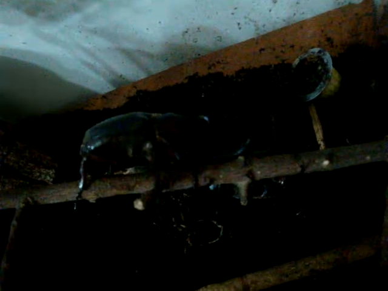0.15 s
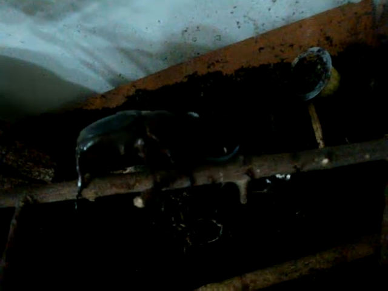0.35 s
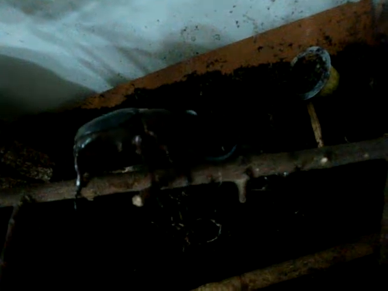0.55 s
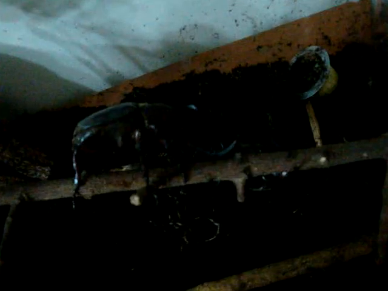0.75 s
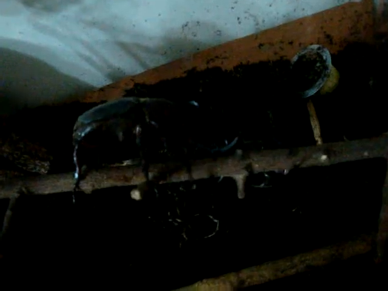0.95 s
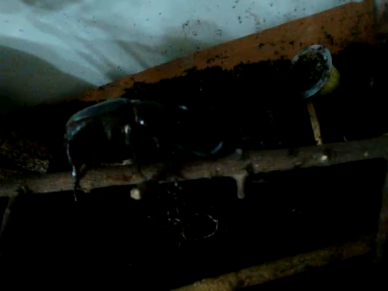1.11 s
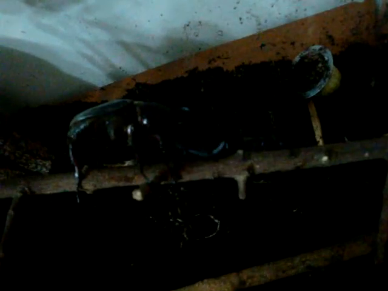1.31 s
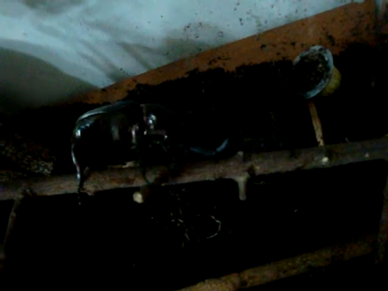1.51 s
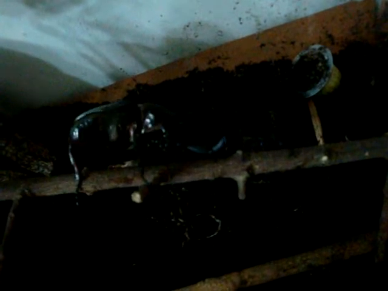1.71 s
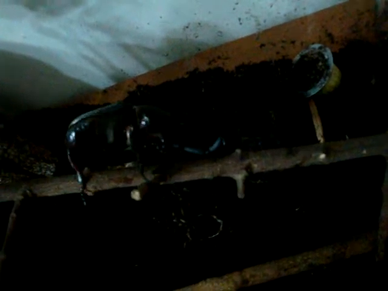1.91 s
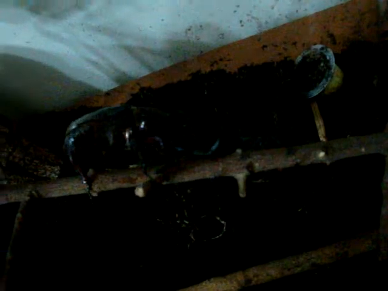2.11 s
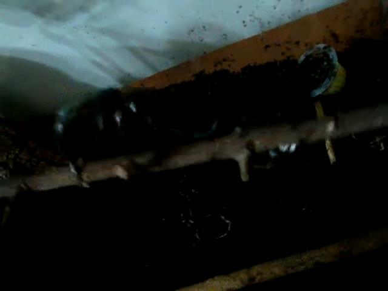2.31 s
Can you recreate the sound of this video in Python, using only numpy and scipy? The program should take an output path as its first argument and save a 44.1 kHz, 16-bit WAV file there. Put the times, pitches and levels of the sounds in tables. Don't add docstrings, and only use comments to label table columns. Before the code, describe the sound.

A large beetle scrapes on a twig in a thin box, heard close on a small, dull microphone. Faint claw ticks start it; a light slip scrapes at 0.2 seconds, then a stronger one at 0.46 booms the box and leaves a low shudder. Ticks and faint scrapes follow from 0.8, a soft rustle at 1.7 to 2, and last ticks near 2.3. Hiss, murmur and faint mains buzz continue throughout.

```python
import sys
import numpy as np
from scipy import signal
from scipy.fft import rfft, irfft, next_fast_len
from scipy.io import wavfile
from scipy.ndimage import uniform_filter1d, map_coordinates

SR = 44100
rng = np.random.default_rng(int(sys.argv[2]) if len(sys.argv) > 2 else 0)


def wrap_up_sound(samples):
    columns = np.atleast_2d(samples).T
    tamed = np.clip(columns, -1, 1)
    steps = np.round(tamed * 32767).astype(np.int16)
    wavfile.write(sys.argv[1], SR, steps)


def gain_from_db(level_db):
    decades = np.asarray(level_db, float) / 20
    return 10 ** decades


N = 103635


def unit(x):
    return x / np.sqrt(np.mean(x ** 2) + 1e-20)


def wobble(rate):
    knots = rng.standard_normal(int(N * rate / SR) + 4)
    return map_coordinates(knots, [np.arange(N) * rate / SR])


def filtered(x, response):
    m = next_fast_len(len(x) + SR // 2)
    return irfft(rfft(x, m) * response(np.fft.rfftfreq(m, 1 / SR)), m)[:len(x)]


def resonant(x, peaks):
    def response(f):
        total = 0
        for k, (centre, width, db) in enumerate(peaks):
            damping = 1j * f * width
            total = total + (-1) ** k * gain_from_db(db) * damping / (centre * centre - f * f + damping)
        return total
    return filtered(x, response)


def resonant_noise(peaks):
    return unit(resonant(resonant(rng.standard_normal(N), peaks), peaks))


def add(track, s, sound):
    part = track[round(s * SR):][:len(sound)]
    part += sound[:len(part)]


def swell(s, rise, t60, db):
    t = np.arange(N) / SR
    fade = -60 * np.clip(t - s - rise - 0.015, 0, None) / t60
    return np.clip((t - s) / rise, 0, 1) ** 0.89 * gain_from_db(db + fade)


# (frequency [Hz], level [dB per Hz])
HISS = [(18, -43), (30, -40.5), (251, -0.5), (363, -2), (549, -17), (740, -3.5), (1010, -10), (4170, -15),
        (10300, -23.5), (13400, -55), (22000, -120)]
# (frequency [Hz], width [Hz], level [dB])
MURMUR = [(122.4, 108, 5), (184, 100, 4), (361, 62, -4.5), (770, 470, 1)]


def room_tone():
    hiss_db, patchy_db = -49, 2
    murmur_db, sway_db = -54.5, 1
    z = signal.stft(rng.standard_normal(N + 512), nperseg=512)[2]
    patches = uniform_filter1d(rng.standard_normal(z.shape), 6, 0)
    patches = unit(uniform_filter1d(patches, 8, 1))
    noise = signal.istft(z * gain_from_db(patchy_db * patches), nperseg=512)[1][:N]
    f, db = np.transpose(HISS)
    hiss = unit(filtered(noise, lambda hz: gain_from_db(np.interp(np.log(hz + 1), np.log(f + 1), db))))
    murmur = resonant(rng.standard_normal(N), MURMUR)
    murmur = unit(resonant(murmur, [(303, 300, 0)]))
    return gain_from_db(hiss_db) * hiss + gain_from_db(murmur_db + sway_db * wobble(6.5)) * murmur


# (multiple of the mains [count], rms level [dB])
BUZZ = [(1, -73.5), (2, -59), (3, -56), (5, -57.5), (6, -53), (7, -56), (8, -63.5), (10, -66.5), (11, -86),
        (12, -55.5), (13, -62.5), (14, -59.5), (15, -72), (18, -71)]


def mains_buzz():
    mains_hz, sway_db = 59.92, 1.1
    phase_spread = 0.1184
    turn = 2 * np.pi * mains_hz * np.arange(N) / SR
    out = np.zeros(N)
    for k, db in BUZZ:
        level = np.sqrt(2) * gain_from_db(db + sway_db * wobble(8.78))
        out += level * np.sin(k * turn + phase_spread * k * k)
    return out


# (time [s], peak level [dB], frequency [Hz])
PINGS = [(0.068, -46, 3100), (0.0857, -48, 3460), (0.1431, -39, 2770), (0.8769, -39, 2080),
         (0.9787, -37.5, 3160), (1.073, -33.5, 2850), (1.1243, -41, 3100), (1.1877, -41, 3250),
         (1.3742, -45, 3340), (1.4082, -35.5, 3060), (1.412, -39, 2560), (1.514, -45, 3220),
         (1.5204, -41, 2750), (1.569, -41, 4000), (1.659, -39, 2804), (1.6661, -34, 2700),
         (1.7429, -38.5, 3390), (1.8646, -37, 3490), (1.8786, -33.5, 3580), (1.907, -42, 3530),
         (1.925, -39, 3620), (1.9834, -40, 3140), (2.0213, -41, 3420), (2.2034, -35.5, 3350)]
# (time [s], peak level [dB], frequency [Hz])
HIGH_PINGS = [(.047, -46, 4100), (.096, -46.5, 4700), (.113, -49, 4730), (.162, -46, 4520),
              (.274, -49, 5700), (.291, -45, 5570), (0.4449, -45, 4700), (0.8121, -46, 4620),
              (0.8285, -46, 4830), (1.434, -47, 4950), (1.44, -48.5, 4900), (1.447, -52, 5040),
              (1.4636, -44, 4900), (1.4794, -53, 4860), (1.4964, -44, 4900), (1.616, -47, 4770),
              (1.62, -45, 4130), (1.7475, -52, 4650), (1.772, -40, 4750), (1.781, -50, 4570),
              (1.824, -48, 4700), (1.8468, -48, 4800), (1.8637, -36, 4660), (1.881, -50, 4600),
              (1.916, -49, 4900), (1.938, -49, 4800), (1.948, -43, 4680), (1.9636, -42, 4750),
              (1.99, -52, 7000), (2.329, -40, 4600), (2.3434, -43, 4930)]
# (time [s], peak level [dB], centre frequency [Hz], sharpness [ratio])
SNAPS = [
    (0.782, -49.5, 6600, 2.8),
    (1.0271, -47, 6100, 1.8),
    (1.495, -46, 8000, 1.2),
    (1.618, -49.5, 6940, 1),
    (1.7713, -46, 6040, 0.9),
    (1.947, -45.5, 9400, 8.3),
    (2.33, -47.5, 7010, 5),
]


def claws():
    rise_s, side_level = 0.0032, 0.48
    pitch_sag = 2.3
    snap_t60_s, snap_db = 0.023, 4
    out, t = np.zeros(N), np.arange(SR // 12) / SR
    rise = 1 - np.exp(-t / rise_s)
    turn = 2 * np.pi * t * (1 + pitch_sag * (.008 - t / 2))
    # (ticks, t60 [s], gain [dB], spread of the side modes [share])
    for rows, t60, gain_db, spread in ((PINGS, 0.041, 0, .05), (HIGH_PINGS, 0.015, 10, .03)):
        chances = rng.uniform(-0.847, 1, size=(len(rows), 2, 3, 1))
        for (s, db, hz), (detune, phase) in zip(rows, chances):
            main = np.sin(hz * turn)
            sides = np.sin(hz * (1 + 2 * spread * detune) * turn + np.pi * phase).sum(0)
            envelope = gain_from_db(db + gain_db - 60 * t / t60) * rise
            add(out, s - .002, envelope * (main + side_level * sides))
    for s, db, hz, sharp in SNAPS:
        puff = resonant(rng.standard_normal(len(t)), [(hz, 1.6 * hz / sharp, 0)])
        puff = unit(resonant(puff, [(hz, 1.3 * hz / sharp, 0)]))
        add(out, s - .001, gain_from_db(db + snap_db - 60 * t / snap_t60_s) * puff)
    return out


def room(x):
    t60_s = .35
    t = np.arange(SR // 3) / SR
    tail = rng.standard_normal(len(t)) * gain_from_db(-60 * t / t60_s) * (t > .003)
    return signal.fftconvolve(x, tail / np.linalg.norm(tail))[:N]


# (start [s], rise [s], t60 [s], level [dB], brightness [dB])
STROKES = [
    (0.214, 0.018, 0.47, -44.5, -0.5),
    (0.462, 0.014, 0.16, -34.5, 0),
    (.475, 0.032, 0.6, -39.5, -3.5),
    (.54, 0.09, 0.38, -41.5, -20),
    (0.866, 0.014, 0.23, -52, -12),
    (1.34, 0.042, 0.13, -56.5, 1),
    (1.69, 0.04, 0.4, -51, -8.5),
    (1.77, 0.027, 0.46, -48.5, -15),
    (1.82, 0.052, 0.52, -46, -7),
]


def stroke_shapes():
    late_s = .007
    dull = [swell(*row[:4]) for row in STROKES]
    bright = [swell(s + late_s, rise, t60, db + bright_db) for s, rise, t60, db, bright_db in STROKES]
    return np.linalg.norm(dull, axis=0), np.linalg.norm(bright, axis=0)


def grains():
    grains_per_s, uneven_db, clump_db = 16000, 2, 1.25
    hits = rng.random(N) < grains_per_s / SR
    size = gain_from_db(uneven_db * np.minimum(rng.exponential(size=N), 3))
    return hits * rng.standard_normal(N) * size * gain_from_db(clump_db * wobble(59.95))


# (time [s], boost [dB], length [s])
JOLTS = [(0.2453, 4, 0.012), (0.26, -2, 0.0094), (0.479, 4, 0.0048), (0.484, 2, .008), (.4925, 1, 0.0039),
         (0.501, 4.5, .005), (0.509, 1.5, 0.0093), (0.517, 4.5, .004), (0.524, 2.5, 0.018),
         (0.542, 2, 0.007), (0.585, 5, 0.0053), (0.599, 5, 0.0041), (0.619, 1, 0.0063), (0.63, 0.5, 0.012),
         (.65, -0.5, 0.0093), (1.716, 6.5, 0.011), (1.74, 5, 0.0094), (1.811, 3.5, 0.011), (1.84, 2, .008),
         (1.913, 0.5, .008), (1.92, 6, 0.0071)]


def jolts():
    t = np.arange(N) / SR
    return gain_from_db(sum(db * np.exp(-(2 * (t - s) / length) ** 2) for s, db, length in JOLTS))


# (start [s], rise [s], t60 [s], level [dB])
SQUEALS = [
    (0.224, 0.0091, 0.21, -40.5),
    (0.451, 0.016, 0.11, -41.5),
    (.872, 0.0078, 0.18, -53),
    (1.4, 0.0054, 0.052, -65),
    (1.79, 0.015, 0.18, -56),
]
# (frequency [Hz], width [Hz], level [dB])
WING_CASE = [(2016, 450, 0)]
# (frequency [Hz], width [Hz], level [dB])
SHELL = [(1766, 420, -4.5), (3100, 1660, -3), (1260, 810, 1), (720, 670, -2)]
# (frequency [Hz], width [Hz], level [dB])
GRIT = [(4400, 2600, 0), (4910, 1200, 8), (8000, 1700, -0.5)]
# (start [s], rise [s], t60 [s], level [dB])
WHISTLES = [
    (.565, 0.061, .15, -49.5),
    (1.883, 0.011, 0.13, -59),
]
WHISTLE_HZ = [4900, 9000]


def scrape(dull, bright):
    grit_db = -2.5
    squeal = unit(resonant(resonant(grains(), WING_CASE), WING_CASE))
    squeal = sum(swell(*row) for row in SQUEALS) * squeal
    whistle = np.zeros(N)
    for row, hz in zip(WHISTLES, WHISTLE_HZ):
        whistle += swell(*row) * unit(resonant(grains(), [(hz, 700, 0)]))
    shell = jolts() * (squeal + dull * unit(resonant(grains(), SHELL)))
    return shell + whistle + gain_from_db(grit_db) * bright * unit(resonant(grains(), GRIT))


# (time [s], level [dB], rise [s], mode nearest the contact [Hz])
KNOCKS = [(0.222, -31.5, 0.03, 130), (.243, -40, 0.025, 360), (.285, -45, .015, 365), (.54, -43, .01, 360),
          (0.291, -44, .01, 200), (.4, -38, .02, 149), (0.269, -43, 0.019, 129), (0.456, -29, 0.0093, 108),
          (.4645, -20, 0.016, 108), (0.489, -24, 0.0076, 142.5), (.476, -31.5, 0.015, 314),
          (0.504, -30, 0.0055, 310), (.478, -42.5, 0.0033, 810), (.517, -30, 0.0061, 168.4),
          (0.535, -39, 0.0051, 205), (.57, -29, 0.0044, 172.7), (0.605, -36, 0.0042, 127.5),
          (.62, -46, .01, 300), (0.66, -43.5, 0.0072, 181), (1.68, -44, 0.037, 137)]
# (frequency [Hz], level [dB], t60 [s])
BOX = [(99.7, -2, .15), (107, -2, .09), (118, -2.5, 0.15), (129.9, 0.5, 0.26), (152.3, -8, 0.23),
       (178.7, 0.5, 0.19), (270.5, -2, 0.41), (225, -4, .15), (296.6, 0.5, 0.18), (360, -3.5, 0.22),
       (810, -2.5, 0.31)]


def box(dull):
    away_db = 39
    rub_db, box_db, undertone_db = -10.5, 6, -75
    low_hz = 92
    t, out = np.arange(SR // 2) / SR, np.zeros(N)
    hz, level_db, t60 = np.transpose(BOX)[..., None]
    modes = gain_from_db(level_db - 60 * t / t60) * np.sin(2 * np.pi * hz * t)
    for s, db, rise, near_hz in KNOCKS:
        ring = (gain_from_db(db - away_db * abs(np.log2(hz / near_hz))) * modes).sum(0)
        add(out, s, ring * np.sin(np.pi / 2 * np.clip(t / rise, 0, 1)) ** 2)
    tilted = (modes * hz[0] / hz).sum(0)
    rub = gain_from_db(rub_db) * dull * rng.standard_normal(N)
    out += signal.fftconvolve(rub, tilted / np.linalg.norm(tilted))[:N]

    def radiation(f):
        return (f * f / (f * f - low_hz ** 2 - 1.1j * f * low_hz)) ** 2
    return gain_from_db(box_db) * filtered(out, radiation) + gain_from_db(undertone_db) * resonant_noise([(54.4, 40, 0)])


# (start [s], rise [s], t60 [s], level [dB])
SHUDDERS = [
    (.23, 0.032, .9, -59),
    (.46, 0.018, 1.1, -44.5),
    (1.75, .1, .6, -72),
]
# (frequency [Hz], width [Hz], level [dB])
SHELF = [(71.4, 86, 0)]


def shelf():
    return sum(swell(*row) for row in SHUDDERS) * resonant_noise(SHELF)


def scene():
    room_db = -12.5
    dull, bright = stroke_shapes()
    near = claws() + scrape(dull, bright)
    beetle = near + gain_from_db(room_db) * room(near)
    return (room_tone() + mains_buzz() + beetle + box(dull) + shelf())[None]


# (start [s], length [s], low edge [Hz], high edge [Hz])
DROPOUTS = [(.07, .009, 5600, 6700), (.166, .008, 6200, 7800), (.2, .022, 7200, 7900),
            (.207, .008, 5700, 6200), (.302, .012, 5100, 5800), (.455, .0065, 2720, 5000),
            (.454, .012, 5000, 10500), (.516, .008, 7400, 8000), (.55, .012, 5400, 6300),
            (.998, .024, 5900, 7840), (1.019, .006, 8000, 10300), (1.037, .027, 5500, 6230),
            (1.355, .008, 6200, 7400), (1.441, .014, 9700, 10500), (1.467, .023, 8700, 10500),
            (1.484, .006, 6300, 7700), (1.512, .021, 5700, 6400), (1.54, .016, 9300, 10500),
            (1.627, .008, 9300, 10500), (1.752, .01, 5900, 7600), (1.75, .016, 8800, 10500),
            (1.777, .008, 6600, 7300), (1.87, .009, 4600, 5200), (1.93, .015, 8600, 10500),
            (1.954, .006, 6200, 7200), (1.957, .008, 8560, 10500), (1.972, .016, 6700, 7400)]


def dropouts(x):
    drop_db = -21
    stray_db, stray_share, stray_from_hz = -51, .095, 4400
    cell_bins, cell_steps = 3, 5
    hz, t, z = signal.stft(x, SR, nperseg=256, noverlap=192)
    cells = rng.random((len(hz) // cell_bins + 1, len(t) // cell_steps + 1)) < stray_share
    stray = np.kron(cells, np.ones((cell_bins, cell_steps)))[:len(hz), :len(t)]
    loss = stray_db * stray * (hz > stray_from_hz)[:, None]

    def edge(v, a, b, soft):
        return np.clip(np.minimum(v - a, b - v) / soft + .5, 0, 1)
    for s, length, low_hz, high_hz in DROPOUTS:
        gap = np.outer(edge(hz, low_hz, high_hz, 170), edge(t, s, s + length, 0.0024))
        loss = np.minimum(loss, drop_db * gap)
    return signal.istft(z * gain_from_db(loss), SR, nperseg=256, noverlap=192)[1][:N]


def roll_off(x):
    return signal.sosfilt(signal.butter(12, 10770, fs=SR, output="sos"), x)


def record(dry):
    top_hz = 10150
    band = filtered(dropouts(dry[0]), lambda hz: gain_from_db(-60 * np.clip((hz - top_hz + 150) / 600, 0, 2)))
    return roll_off(band[None])


dry = scene()
out = record(dry)
wrap_up_sound(out)
```